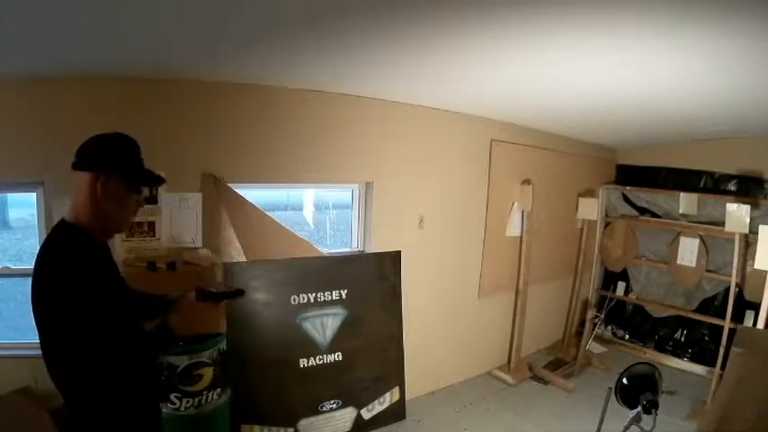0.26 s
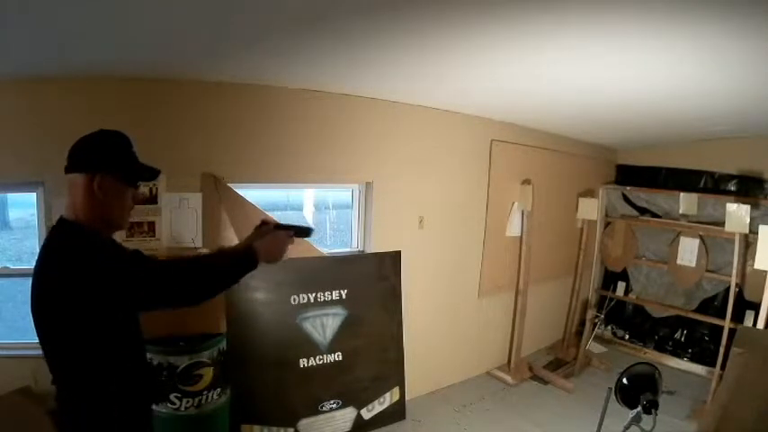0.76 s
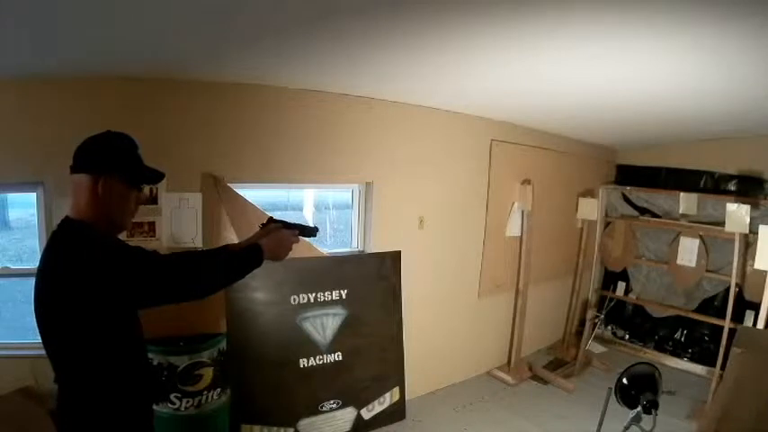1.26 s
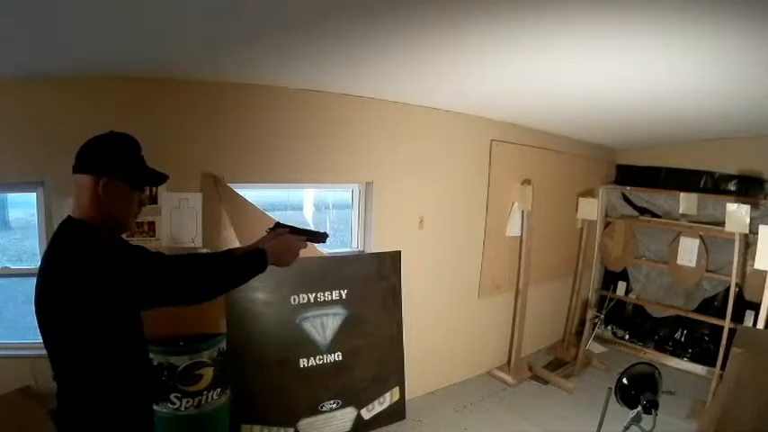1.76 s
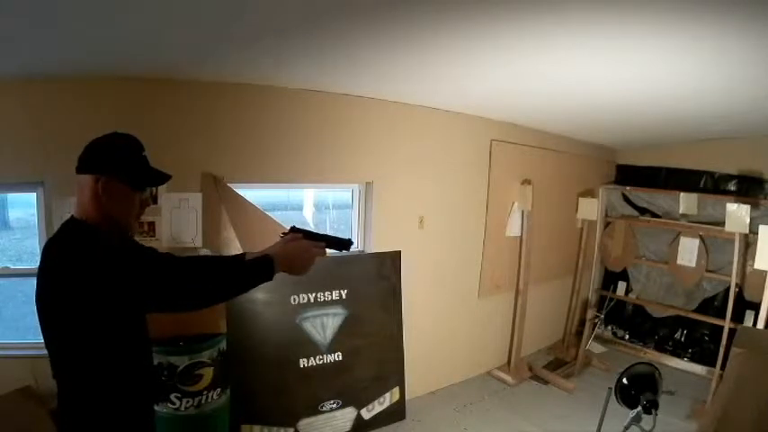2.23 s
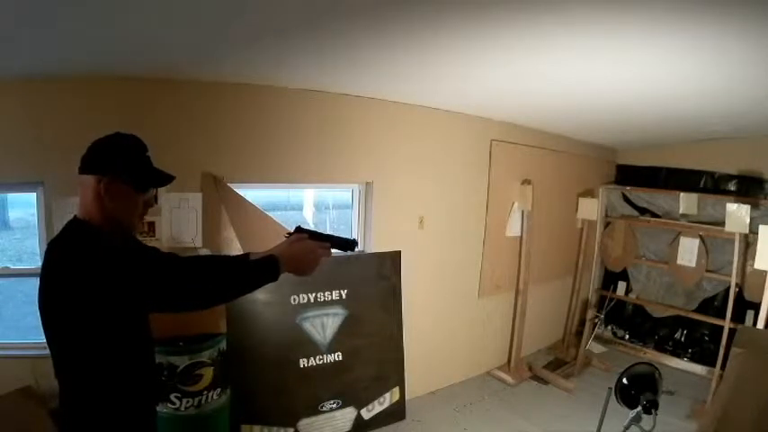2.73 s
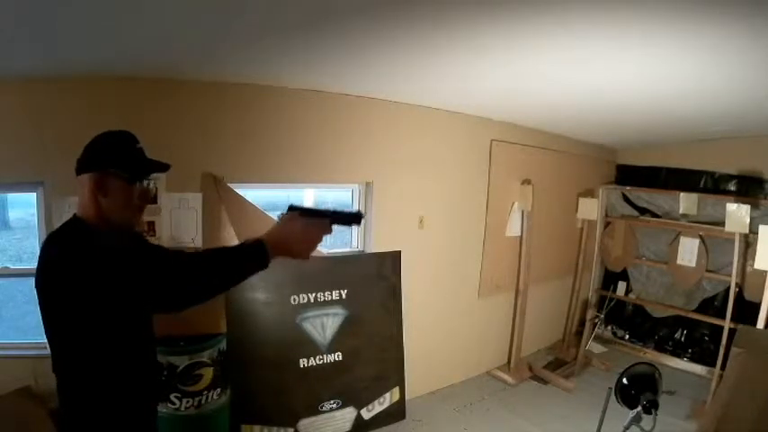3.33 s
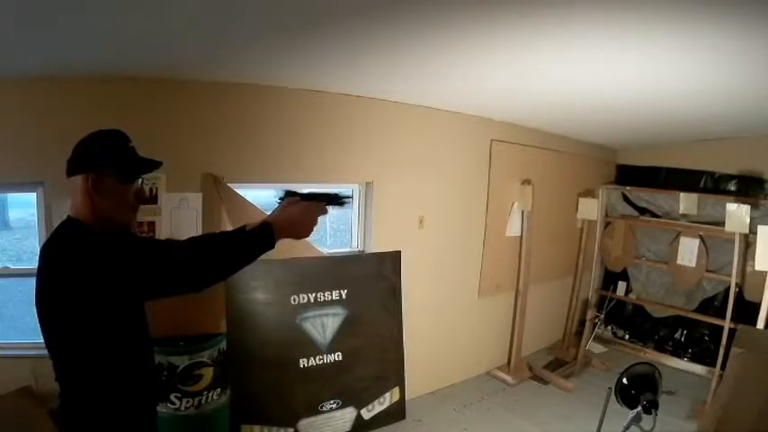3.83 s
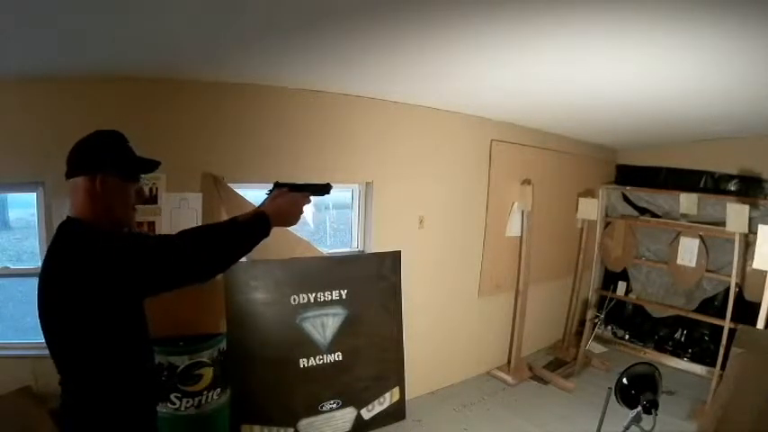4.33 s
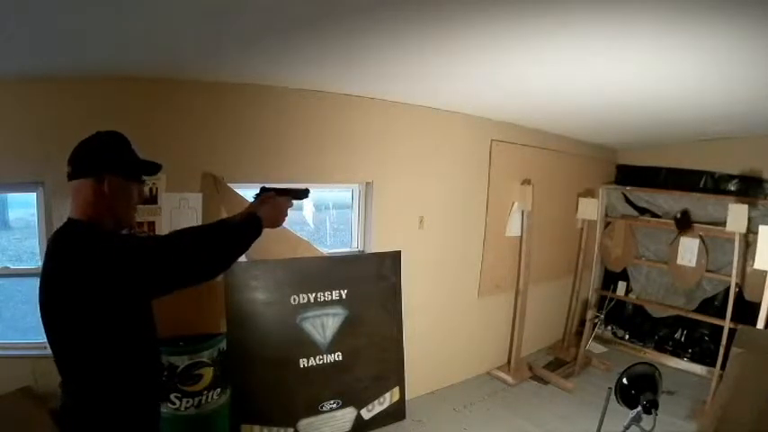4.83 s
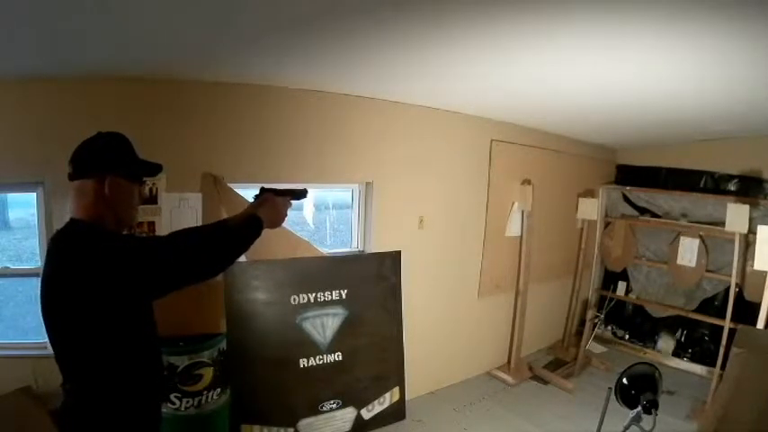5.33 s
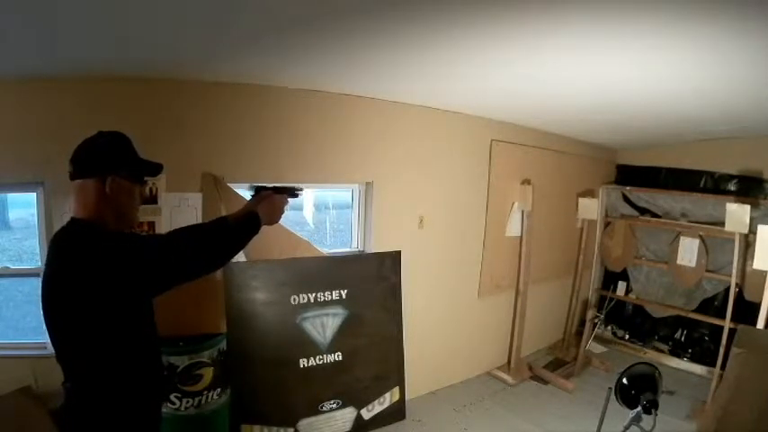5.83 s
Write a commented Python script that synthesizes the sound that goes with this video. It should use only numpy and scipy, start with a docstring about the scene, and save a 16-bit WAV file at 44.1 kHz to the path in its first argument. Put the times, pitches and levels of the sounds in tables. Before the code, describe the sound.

A bare, hard-walled garage, heard through a small camera microphone with low hiss and a faint high whine. At about 0.2 s a pistol slide is released with a sharp steel clack and short ring; quiet dull knocks and bright trigger ticks follow. At 1.3 s the first gas shot pops: hammer snap, airy low thump, two fast slide clacks, then a pellet smacking a distant metal plate. Small clicks fill the pause until a somewhat softer shot at 2.6 s. From 3.4 s shots come about every 0.4 s: 3.4, 3.8, 4.2, 4.6, 5.0, a weaker report at 5.5, and 5.8. Pellets ping the plates; toppled plates thud and rattle near 3.4, 4.4 and 5.3 s, the last the loudest clang. A faint low rack boom follows around 4.8 and 5.1 s. Peaks sound flattened, and echoes drop away abruptly.

```python
"""A gas airsoft pistol is readied and fires nine shots in a bare, echoing garage with a camera running.
The released slide clacks at 0.2 s as noise bursts and steel modes; dull knocks and bright ticks follow.
From 1.3 s each shot is a hammer snap, a gas puff with a low thump, and two slide blows that ring.
Pellets excite the modes of metal plates; from 3.4 s toppled plates clatter down, and from 4.8 s their rack booms.
Throughout, the camera turns quiet tails down, adds hiss and whine, and flattens the peaks."""
import sys
import numpy as np
from scipy import signal
from scipy.fft import rfft, irfft
from scipy.io import wavfile

SR = 44100
rng = np.random.default_rng(int(sys.argv[2]) if len(sys.argv) > 2 else 0)


def generate_wav(signal):
    """Clip the signal to [-1, 1] and save it as 16-bit WAV at the path in sys.argv[1]."""
    frames = np.transpose(np.atleast_2d(signal))
    scaled = np.clip(frames, -1, 1) * 32767
    pcm = np.round(scaled).astype(np.int16)
    wavfile.write(sys.argv[1], SR, pcm)


N = 268569  # length in samples


def amp(db):
    """Logarithmic level: decibels to an amplitude factor."""
    return np.exp(np.asarray(db) * np.log(10) / 20)


def unit(x):
    """Normalisation: scale x to an rms of 1."""
    return x / np.sqrt(np.mean(x ** 2) + 1e-20)


def along(points, hz):
    """Logarithmic interpolation: read a table of (f/Hz, value) at the frequencies hz."""
    f, v = np.transpose(points)
    return np.interp(np.log(hz + 1), np.log(f + 1), v)


def noise(spectrum, size):
    """Spectral shaping: white noise is weighted bin by bin and brought to rms 1."""
    white = rfft(rng.standard_normal(size))
    hz = np.fft.rfftfreq(size, 1 / SR)
    return unit(irfft(white * amp(along(spectrum, hz)), size))


def add(track, s, sound):
    """Superposition: mix a sound into the track at time s, cut at the track's end."""
    part = track[max(round(s * SR), 0):][:len(sound)]
    part += sound[:len(part)]


def burst(spectrum, rise, t60):
    """Heavy damping: a blow excites a dense spectrum that swells and dies at once."""
    t = np.arange(SR // 5) / SR
    swell = 1 - np.exp(-t / rise)
    decay = amp(-60 * t / t60)
    return noise(spectrum, len(t)) * swell * decay


def ring(modes, rise, size=SR):
    """Modal vibration: each blow drives the modes at new strengths; close pairs of modes beat."""
    t = np.arange(size) / SR
    hz, db, t60 = np.transpose(modes)[:, :, None]
    scatter_db = 2 * rng.standard_normal(hz.shape)
    strength = amp(db + scatter_db - 60 * t / t60)
    split_hz = rng.uniform(5, 14, hz.shape)
    phase = 2 * np.pi * (hz * t + rng.random(hz.shape))
    lag = 2 * np.pi * (split_hz * t + rng.random(hz.shape))
    pair = np.sin(phase) + .5 * np.sin(phase - lag)
    return np.sum(strength * pair, axis=0) * (1 - np.exp(-t / rise))


# Reverberation time of the room: f/Hz, t60/s
GARAGE_T60 = [(80, 0.34), (200, 0.27), (450, 0.78), (900, 1.35), (1800, 1.23), (3500, 1.047), (6000, 0.89),
              (11000, 0.62), (16000, 0.47)]
# Relative reflection from the walls: f/Hz, level/dB
WALLS = [(25, -14), (80, -14), (300, 8), (1400, 0.5), (4000, 2), (8000, -2.5), (12000, -2.5), (13500, -10),
         (16000, -3)]


def garage(spectrum, build):
    """Diffuse reverberation: the echo of a blow builds up, then each frequency dies at its own rate; energy 1."""
    hz, t, z = signal.stft(rng.standard_normal(SR), SR, nperseg=256)
    colour_db = along(spectrum, hz) + along(WALLS, hz)
    decay_db = 60 * t / along(GARAGE_T60, hz)[:, None]
    tail = signal.istft(z * amp(colour_db[:, None] - decay_db), SR, nperseg=256)[1][:SR]
    tail = tail * (1 - np.exp(-np.arange(SR) / SR / build))
    return tail / np.linalg.norm(tail)


def blow(spectrum, rise, t60, echo_db, build):
    """Direct and reverberant field: a burst with a room echo set relative to its energy."""
    direct = burst(spectrum, rise, t60)
    sound = amp(echo_db) * np.linalg.norm(direct) * garage(spectrum, build)
    add(sound, 0, direct)
    return sound


# Flat excitation of the room: f/Hz, level/dB
EVEN = [(20, 0), (16000, 0)]


def echoed(x, echo_db):
    """Interference: a ring meets its own reflections, so its tones waver and linger."""
    reflections = signal.fftconvolve(x, garage(EVEN, build=0.00082))[:len(x)]
    return x + amp(echo_db) * reflections


# Clacks of the slide as it is released to chamber a pellet: t/s, level/dB
SLIDE_RELEASE = [(0.176, -23), (0.204, -22.5), (0.2119, -6.5)]
# Spectrum of a clack: f/Hz, relative level/dB (per Hz)
RACKING = [(100, -33.5), (300, -42), (750, -24), (1080, -9.5), (1400, -6.5), (1930, -5.5), (3250, -8.5),
           (3780, -6.5), (4300, -8.5), (5200, -3.5), (7300, -9.5), (8300, -7.5), (12000, -9), (16000, -20)]
# Modes of the frame: f/Hz, level/dB, t60/s
FRAME_MODES = [(1075, -3.5, 0.084), (1640, -2, 0.1), (1938, 7, 0.061), (2202, 1.5, .08),
               (3620, -1.5, 0.069), (3760, -2, .06), (5300, 7, 0.04), (5260, -1, .06), (6686, 6, 0.13),
               (8400, -6, .04)]


def slide_release():
    """Impact excitation: the released slide clacks and sets the frame's modes ringing."""
    out = np.zeros(N)
    for s, db in SLIDE_RELEASE:
        add(out, s, amp(db) * blow(RACKING, rise=0.0014, t60=0.081, echo_db=0.0, build=.005))
        add(out, s, amp(db - 13.5) * echoed(ring(FRAME_MODES, rise=0.00085), echo_db=-2.5))
    return out


# Trigger and grip clicks: t/s, dull knock level/dB, bright tick level/dB
CLICKS = [(0.652, -32, -49), (0.774, -29, -28), (0.873, -44, -31), (1.294, -24.5, -20.5), (1.687, -53, -24),
          (2.014, -26, -22.5), (2.226, -25.5, -18.5), (2.411, -27, -38), (2.991, -44, -18),
          (3.035, -37.5, -13.5), (4.128, -35, -12), (4.865, -28, -19.5), (4.948, -20.5, -43)]
# Spectra of a knock and a tick: f/Hz, relative level/dB (per Hz)
KNOCK = [(100, -25.5), (500, -12.5), (1150, 1.5), (2400, -8), (5000, -17.5), (16000, -19.5)]
TICK = [(100, -39), (1200, -9.5), (3000, -2), (4500, -2), (6500, -3), (9000, -8), (12000, -8.5),
        (16000, -22.5)]


def clicks():
    """Contact duration: small parts give a slower, dull knock together with a shorter, bright tick."""
    out = np.zeros(N)
    for s, knock_db, tick_db in CLICKS:
        add(out, s, amp(knock_db) * blow(KNOCK, rise=0.0014, t60=0.042, echo_db=5.5, build=0.0046))
        add(out, s, amp(tick_db) * blow(TICK, rise=0.00044, t60=0.017, echo_db=3.5, build=.005))
    return out


# Shots: t/s, report level/dB, time until the slide is home t/s, slide ring level/dB
SHOTS = [(1.335, -3, 0.032, -18), (2.586, -7, 0.037, -14), (3.436, -2.5, 0.033, -10),
         (3.788, 1, 0.044, -14), (4.190, 0, 0.039, -12), (4.629, -1, 0.042, -5), (5.032, 0.5, .0425, -3),
         (5.453, -9.5, 0.046, -10), (5.796, 0, 0.053, -3)]
# Spectra of the hammer snap, gas puff and low thump: f/Hz, relative level/dB (per Hz)
HAMMER = [(100, -40), (400, -14.5), (1100, 1), (2100, -6.5), (3000, -14), (5500, -11), (9500, -15.5),
          (11500, -6), (16000, -26)]
GAS = [(30, -34.5), (80, -19.5), (200, -14), (500, -6), (850, -11.5), (1130, 5.5), (1400, 2.5),
       (2050, -2.5), (3000, -11), (6000, -12.5), (11000, -17.5), (16000, -26.5)]
THUMP = [(25, -29.5), (55, -22), (90, -20), (160, -7.5), (225, 0.5), (330, -2), (520, -1.5), (900, -7),
         (3000, -56.5)]
HAMMER_DB, GAS_DB = -0.5, 1  # relative to the report level
GAS_DELAY_S = .007  # from the hammer to the puff
THUMP_DB, COOLING_DB = -5, 1.04  # level at the first shot; loss per shot as the gas cools


def report():
    """Sudden gas expansion: the hammer opens the valve and the gas bursts out a moment later."""
    out = np.zeros(N)
    for fired, (s, db, _, _) in enumerate(SHOTS):
        puff_s = s + GAS_DELAY_S
        thump_db = THUMP_DB - COOLING_DB * fired
        add(out, s, amp(db + HAMMER_DB) * blow(HAMMER, rise=0.0024, t60=0.085, echo_db=-4.0, build=.012))
        add(out, puff_s, amp(db + GAS_DB) * blow(GAS, rise=0.0023, t60=0.075, echo_db=-4.0, build=0.0097))
        add(out, puff_s, amp(thump_db) * blow(THUMP, rise=.004, t60=0.14, echo_db=-4.5, build=0.011))
    return out


# Spectrum of a slide blow: f/Hz, relative level/dB (per Hz)
STEEL = [(100, -41.5), (600, -17.5), (1050, 0), (2000, 1), (2800, -6), (3500, -5), (3790, 4), (4200, -7),
         (5400, 0), (7300, -6), (8400, 0), (9600, -7.5), (11500, -1), (16000, -11.5)]
# Modes of the slide: f/Hz, level/dB, t60/s
SLIDE_MODES = [(1953, -0.048, 0.065), (3792, 3.1, 0.048), (4900, -7.5, 0.026), (2500, -8.5, .022)]
REAR_STOP_SHARE = .36  # fraction of the slide's cycle at which it meets the rear stop
REAR_STOP_DB, HOME_DB = -0.5, -4.5
HOME_RING_DB = -4.5  # ring of the home blow relative to that of the rear stop


def slide_cycle():
    """Recoil and return: thrown back by the gas, the slide strikes its rear stop, then home, and rings."""
    out, pings = np.zeros(N), np.zeros(N)
    for s, _, cycle, ring_db in SHOTS:
        rear_stop = (REAR_STOP_SHARE * cycle, REAR_STOP_DB, ring_db)
        home = (cycle, HOME_DB, ring_db + HOME_RING_DB)
        for delay, steel_db, ping_db in [rear_stop, home]:
            add(out, s + delay, amp(steel_db) * blow(STEEL, rise=0.0015, t60=0.045, echo_db=0.0, build=0.0027))
            add(pings, s + delay, amp(ping_db) * ring(SLIDE_MODES, rise=0.0013, size=SR // 8))
    return out + echoed(pings, echo_db=-17.5)


# Pellets striking the targets: t/s, smack level/dB, ring level/dB, plate struck
PELLETS = [(1.399, -11, -38.5, "large"), (2.655, -7.5, -29.5, "small"), (3.478, -11, -26, "small"),
           (3.833, -8.5, -23.5, "small"), (4.259, -9.5, -27, "large"), (4.690, -34, -33, "large"),
           (5.098, -12.5, -34, "large"), (5.504, -7.5, -23.5, "small"), (5.834, -8.5, -21, "small")]
# Spectrum of a smack: f/Hz, relative level/dB (per Hz)
SMACK = [(100, -39), (400, -12.5), (800, -17.5), (1450, 0), (2300, -1), (3200, -10.5), (5500, -7.5),
         (9000, -13.5), (12000, -11), (16000, -20.5)]
# Modes of the two plates: f/Hz, level/dB, t60/s
LARGE_PLATE = [(236, -21, 1.2), (754, -2, 1), (947, -8.5, 0.84), (800, -11, 0.37), (2400, -6.5, 0.49),
               (3500, -14, 0.96)]
SMALL_PLATE = [(1168.6, -4, 0.8), (1203, -14.5, 0.8), (1410, 1, 0.31), (1500, -5, 0.43),
               (2070, -11.5, 0.38), (2716, -10.5, 0.36)]
NEIGHBOUR_DB = -11  # the rack passes the blow on to the other plate


def pellets():
    """Coupled vibration: a pellet smacks one distant plate and its neighbour rings along, with strong echo."""
    out = np.zeros(N)
    for s, smack_db, ring_db, struck in PELLETS:
        add(out, s, amp(smack_db) * blow(SMACK, rise=0.00097, t60=0.14, echo_db=0.5, build=0.0039))
        large, small = ring(LARGE_PLATE, rise=0.0068), ring(SMALL_PLATE, rise=0.0034)
        plate, neighbour = (large, small) if struck == "large" else (small, large)
        both = plate + amp(NEIGHBOUR_DB) * neighbour
        add(out, s, amp(ring_db) * echoed(both, echo_db=4))
    return out


# Toppled plates hitting the rack or the floor: t/s, thud level/dB (1.5 dB above the last thud),
# first free ring level/dB, final clang level/dB, rim clank level/dB, delay of the clank t/s
FALLS = [(3.353, -13, -55, -32, -23.5, .012), (4.385, -19.5, -25, -50, -41, 0.022),
         (4.467, -12.5, -21.5, -20, -17, .002), (5.327, -7, -24.5, 1.5, -11.5, 0.041)]
# Spectra of a thud and a rim clank: f/Hz, relative level/dB (per Hz)
THUD = [(40, -37), (150, -7), (300, -5.5), (520, -3.5), (1000, 3), (1600, 9.5), (2000, -12), (3000, -13),
        (6000, -25), (16000, -51)]
CLANK = [(200, -44.5), (900, -1.5), (2200, -2), (3000, -11.5), (5300, -10.5), (7000, -15), (12000, -16),
         (16000, -24)]
# Modes of a plate lying on the floor: f/Hz, level/dB, t60/s
PLATE_ON_FLOOR = [(519, -5, 0.063), (810, -12.5, 0.19), (1646, -1, 0.064), (2400, -5, 0.03)]
SETTLE_S = .076  # from the first touch until the plate lies flat
FLATTEN_DB, DAMPING_DB = 12.5, 14  # over that time the clang grows and the free ring is choked
THUD_GROWS_DB = 3  # the last contact thuds this much harder than the first


def falls(count):
    """Contact damping: a plate lands on edge and rattles through count touches; free ring yields to flat clang."""
    out, rings = np.zeros(N), np.zeros(N)
    for s, thud_db, ring_db, clang_db, clank_db, clank_delay in FALLS:
        clank = blow(CLANK, rise=0.013, t60=0.21, echo_db=12.5, build=0.0054)
        add(out, s + clank_delay, amp(clank_db) * clank)
        for flat in np.linspace(0, 1, count):  # 0 on edge, 1 lying flat
            touch = s + flat * SETTLE_S
            touch_db = thud_db - THUD_GROWS_DB * (1.5 - flat)
            free_db = ring_db - DAMPING_DB * flat
            flat_db = clang_db - FLATTEN_DB * (1 - flat)
            add(out, touch, amp(touch_db) * blow(THUD, rise=0.0029, t60=0.073, echo_db=7.0, build=0.0012))
            add(rings, touch, amp(free_db) * ring(LARGE_PLATE, rise=0.0021))
            add(rings, touch, amp(flat_db) * ring(PLATE_ON_FLOOR, rise=0.0018, size=SR // 4))
    return out + echoed(rings, echo_db=-21)


# Jolts of the target rack: t/s, level/dB
JOLTS = [(4.756, -34), (5.105, -33)]
# Low mode of the wooden rack: f/Hz, level/dB, t60/s
TARGET_RACK_MODES = [(235, -1.5, 0.96)]


def target_rack():
    """Resonance: a tipping plate jolts the wooden target rack, which booms on one low note."""
    out = np.zeros(N)
    for s, db in JOLTS:
        add(out, s, amp(db) * ring(TARGET_RACK_MODES, rise=.008))
    return out


def scene():
    """Superposition of all sources, as one channel."""
    pistol = slide_release() + clicks() + report() + slide_cycle()
    targets = pellets() + falls(count=6) + target_rack()
    return (pistol + targets)[None]


def suppressor(x, threshold_db, slope, depth_db, release):
    """Downward expansion: the further the recent level falls below threshold, the lower the gain."""
    keep = np.exp(-1 / (release * SR))  # release: averaging time constant in s
    power = signal.lfilter([1 - keep], [1, -keep], x ** 2)
    under_db = threshold_db - 10 * np.log10(power + 1e-12)
    return x * amp(-np.clip(slope * under_db, 0, depth_db))


# Spectrum of the camera's hiss: f/Hz, relative level/dB (per Hz)
HISS = [(25, -14), (48, -20), (78, -9.5), (130, -17), (263, -18), (400, -23.5), (1290, -34), (4000, -38),
        (11000, -37), (16000, -47.5)]
HISS_DB, WHINE_DB = -61, -69.0
WHINE_HZ, TOP_HZ = 8659, 16000  # thin whine; upper band limit


def record(dry):
    """Expansion, saturation and band limiting: the camera quietens tails, adds hiss and whine, flattens peaks."""
    x = suppressor(dry, threshold_db=-27.0, slope=2.12, depth_db=25.0, release=0.033)
    whine = np.sin(2 * np.pi * WHINE_HZ * np.arange(N) / SR)
    x = x + amp(HISS_DB) * noise(HISS, N) + amp(WHINE_DB) * whine
    x = x / (1 + np.abs(x / .96) ** 6) ** (1 / 6)  # smooth overload towards 0.96
    low_pass = signal.firwin(301, TOP_HZ, fs=SR)[None]
    return signal.fftconvolve(x, low_pass, mode="same")


dry = scene()
out = record(dry)
generate_wav(out)
```